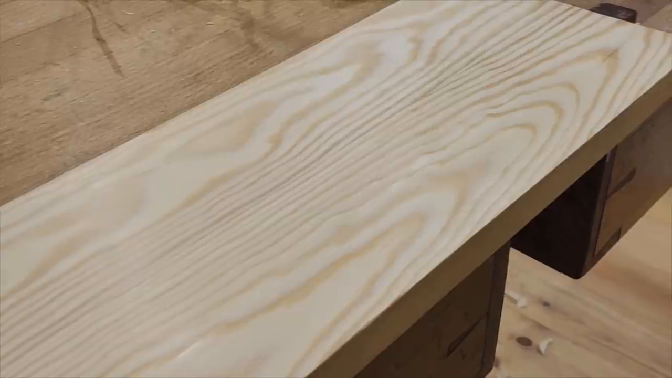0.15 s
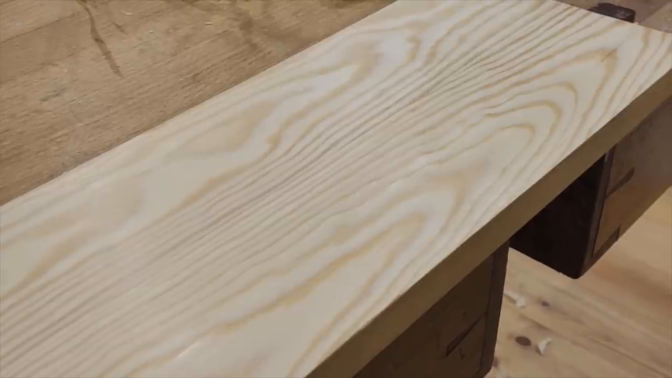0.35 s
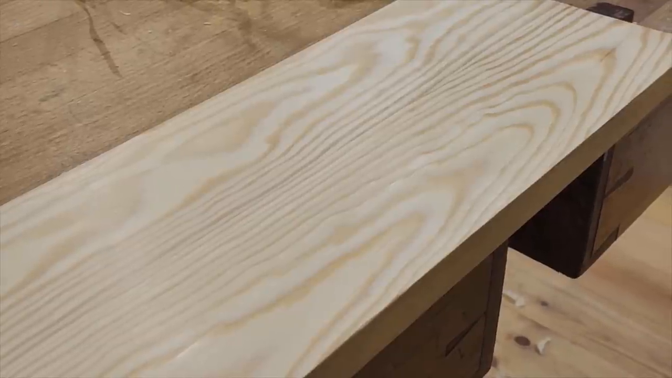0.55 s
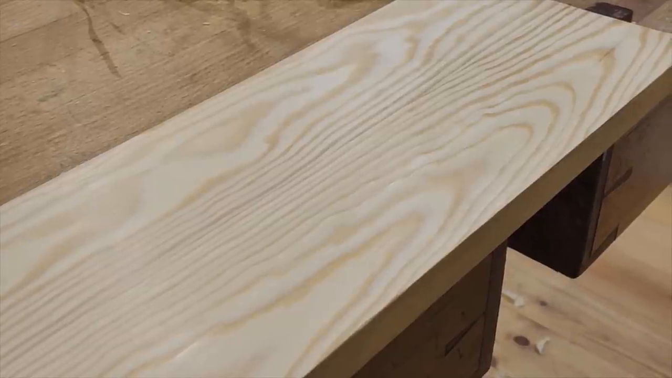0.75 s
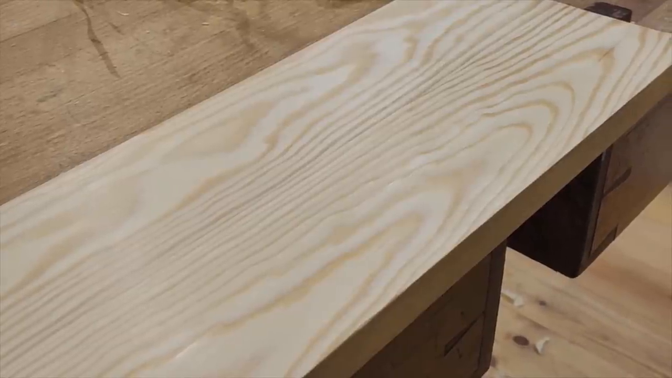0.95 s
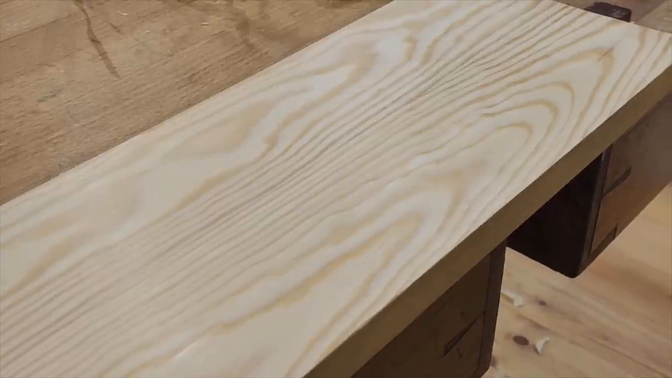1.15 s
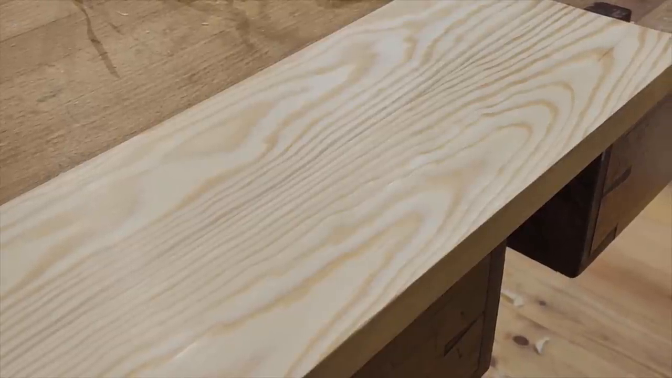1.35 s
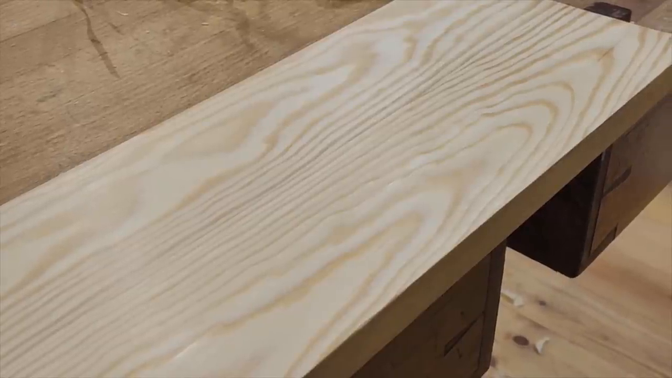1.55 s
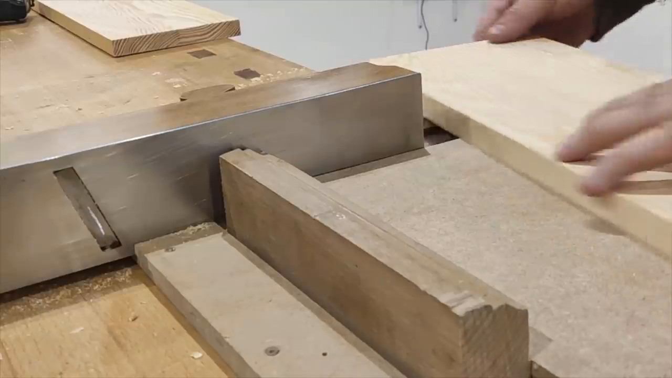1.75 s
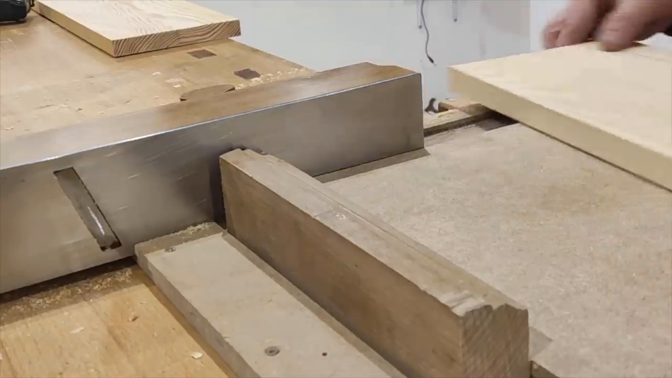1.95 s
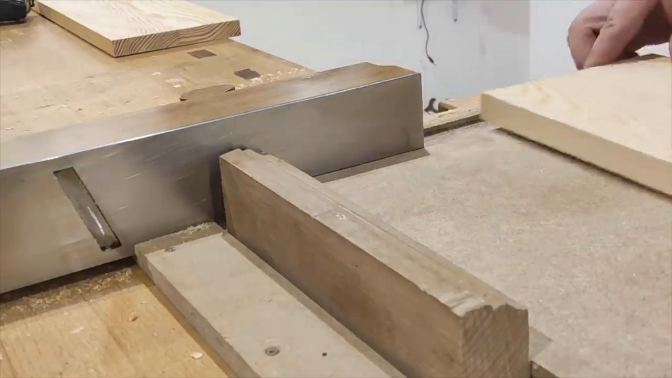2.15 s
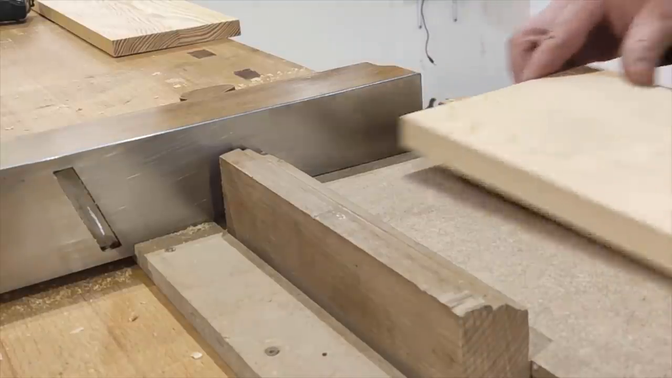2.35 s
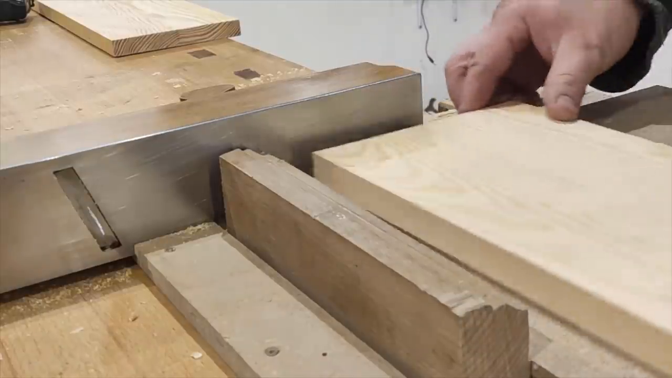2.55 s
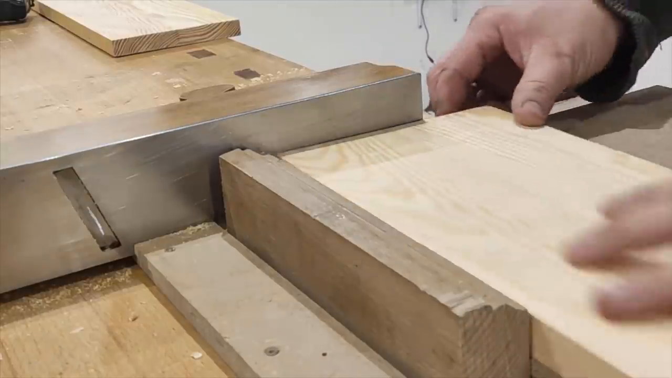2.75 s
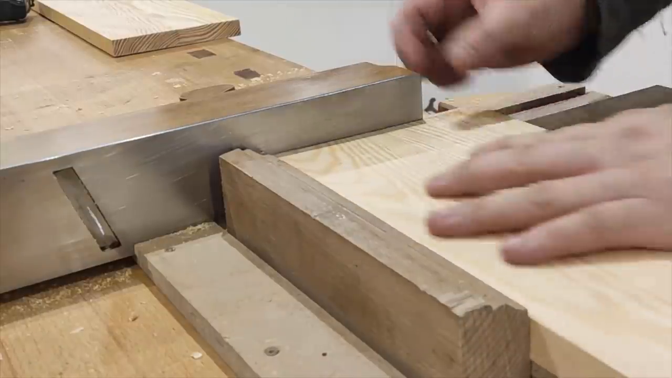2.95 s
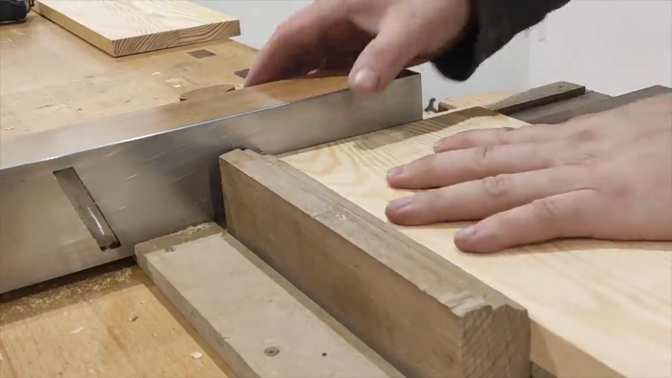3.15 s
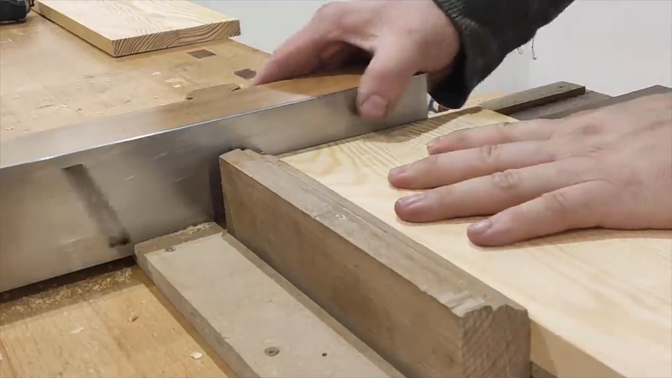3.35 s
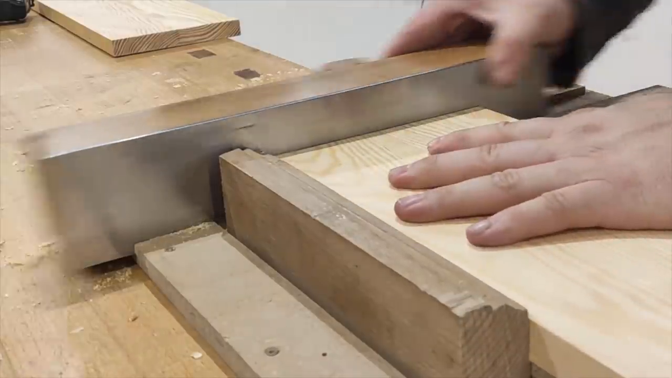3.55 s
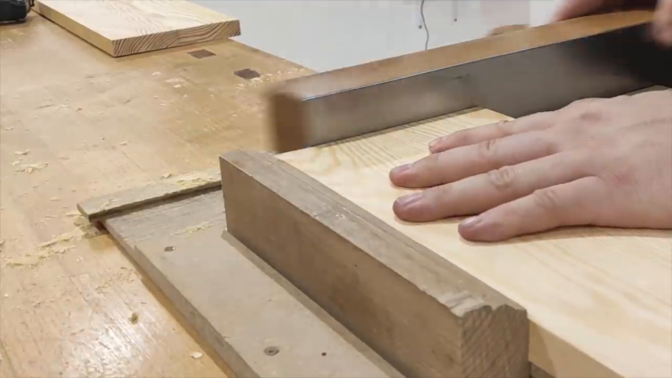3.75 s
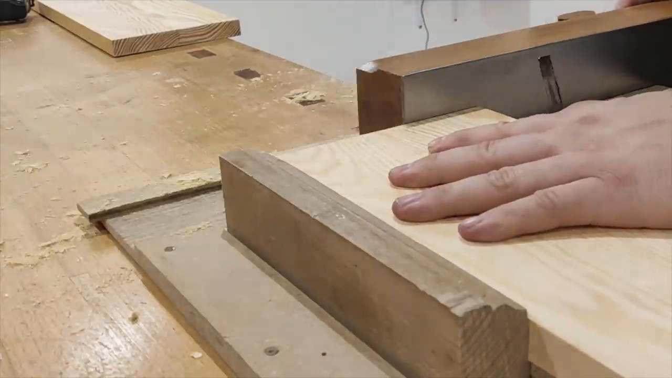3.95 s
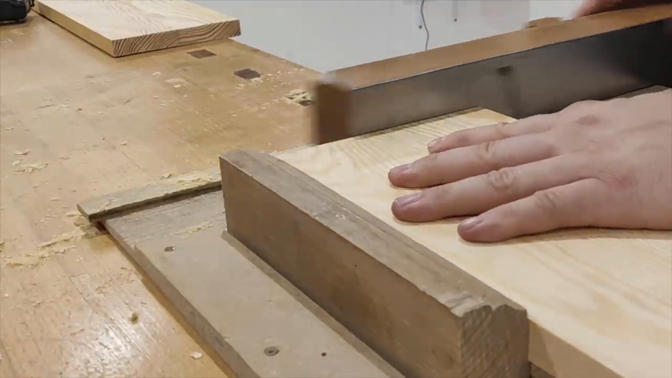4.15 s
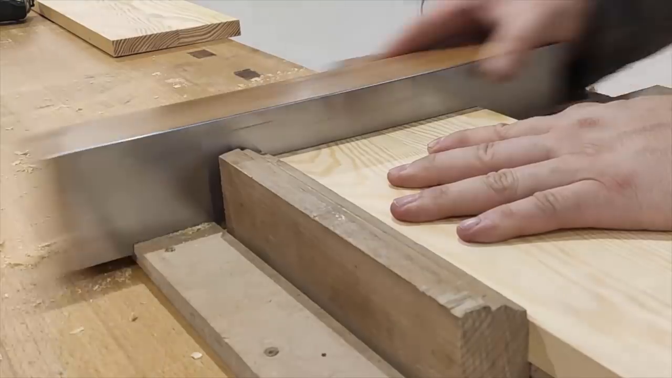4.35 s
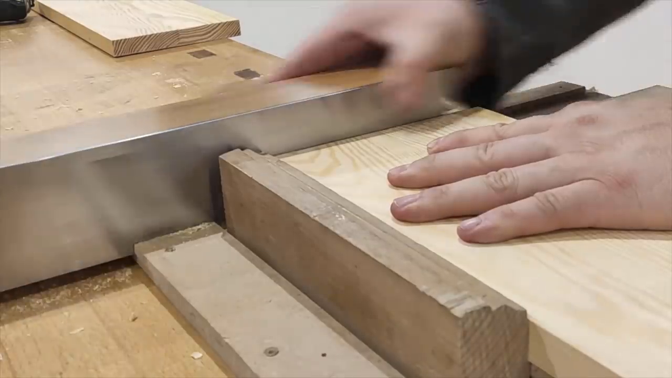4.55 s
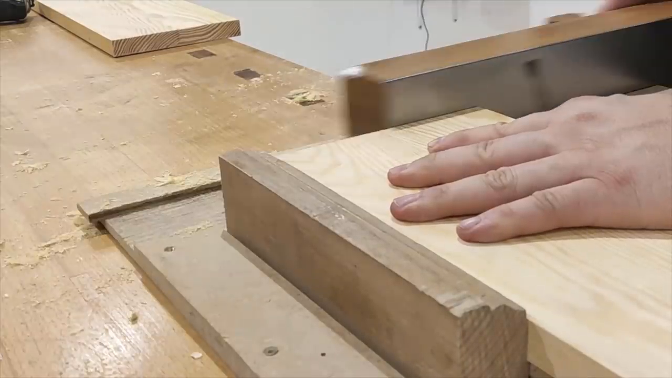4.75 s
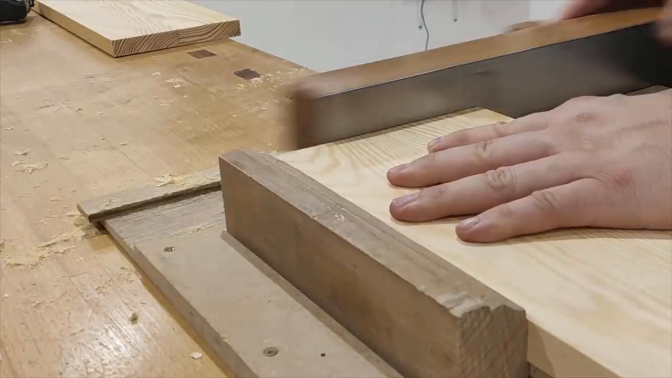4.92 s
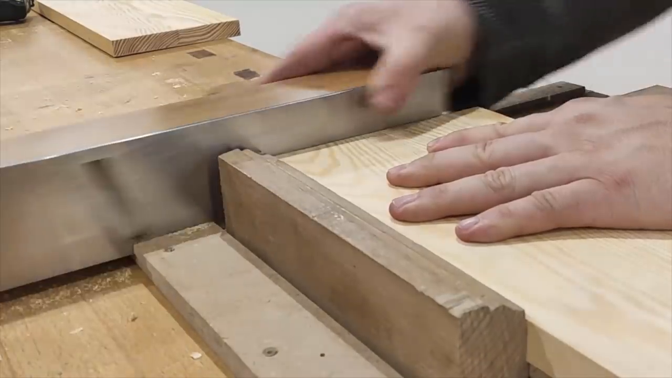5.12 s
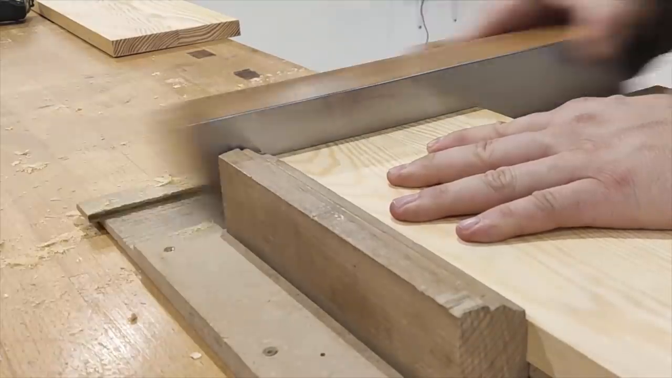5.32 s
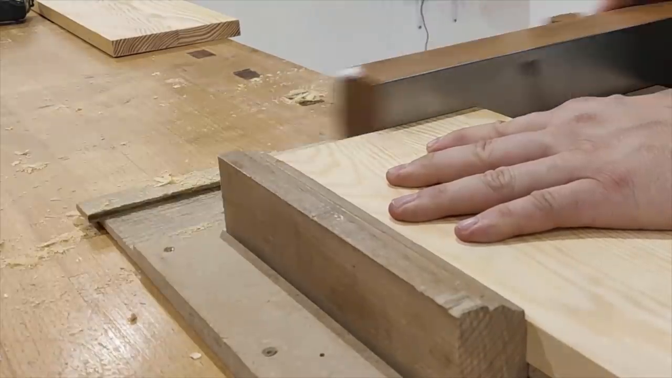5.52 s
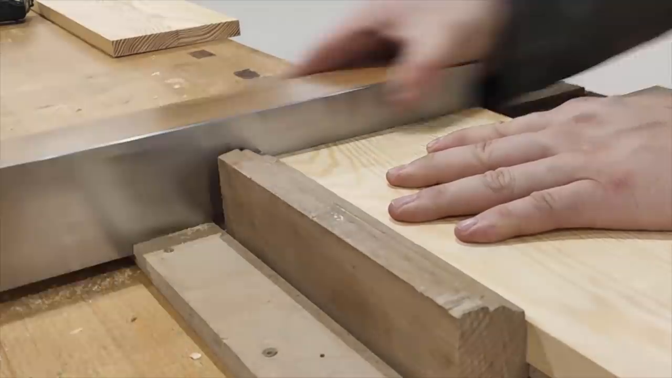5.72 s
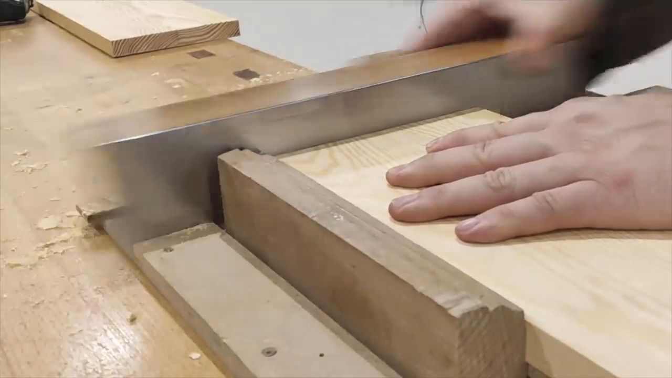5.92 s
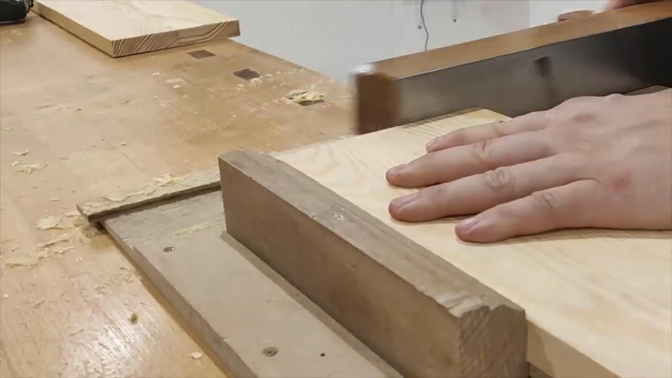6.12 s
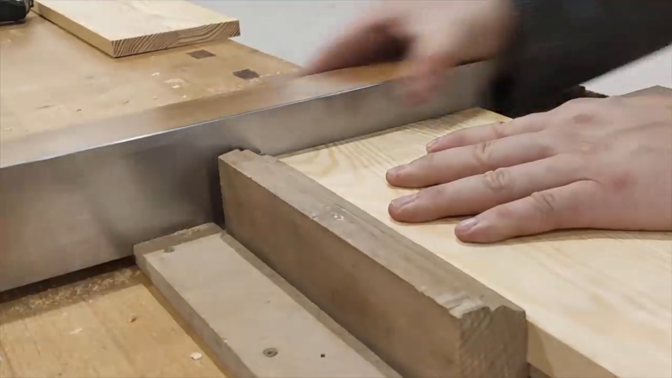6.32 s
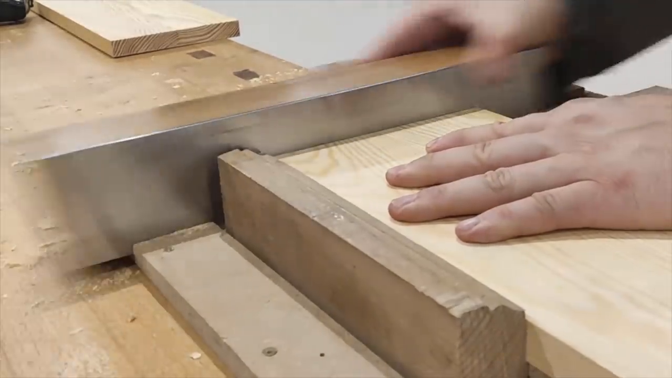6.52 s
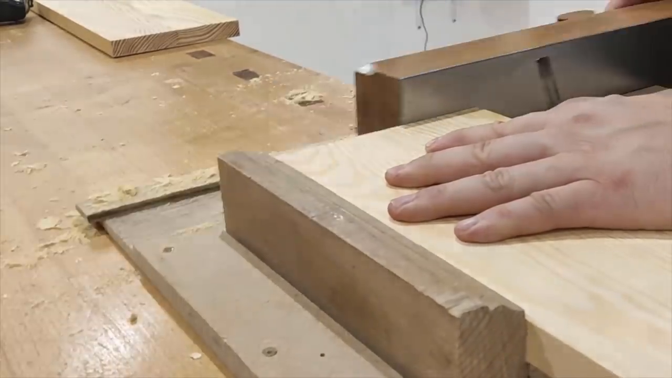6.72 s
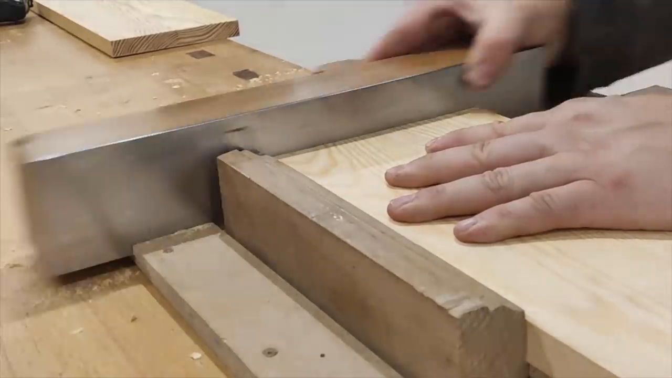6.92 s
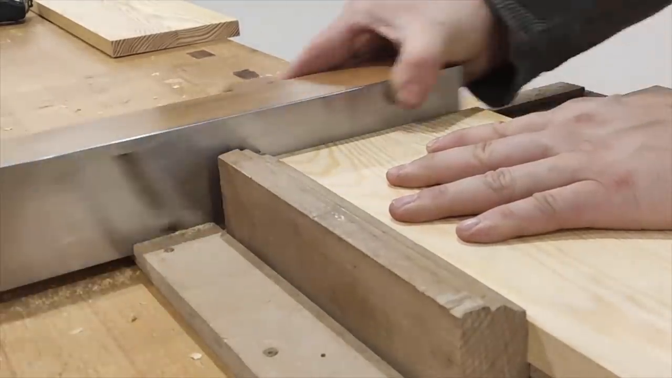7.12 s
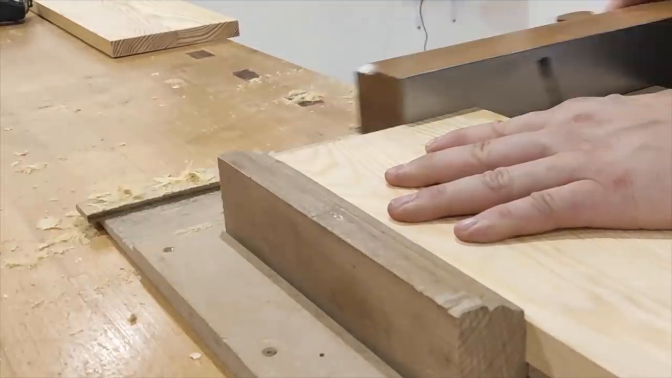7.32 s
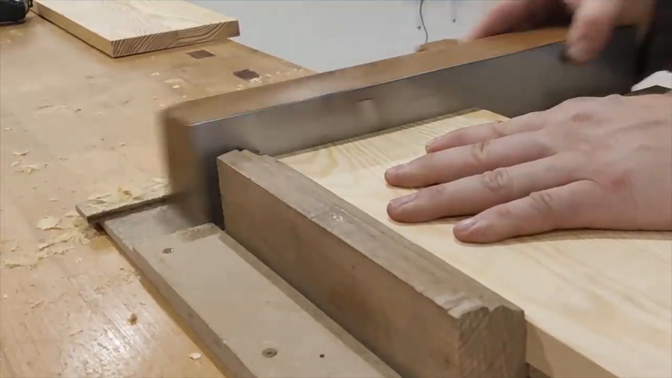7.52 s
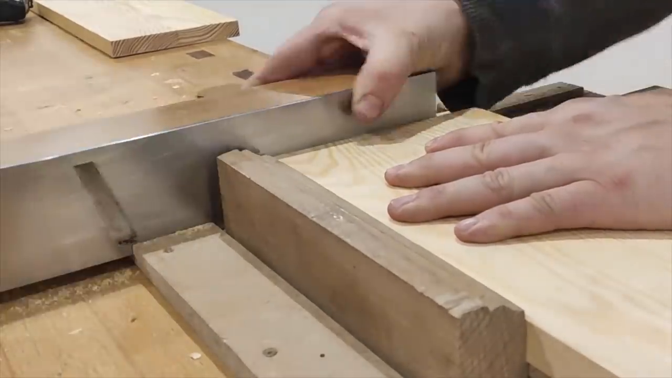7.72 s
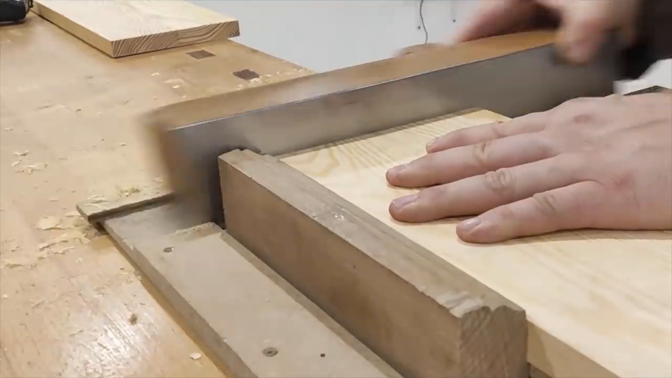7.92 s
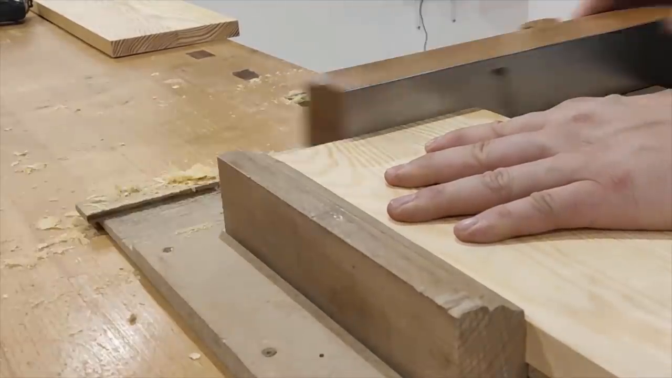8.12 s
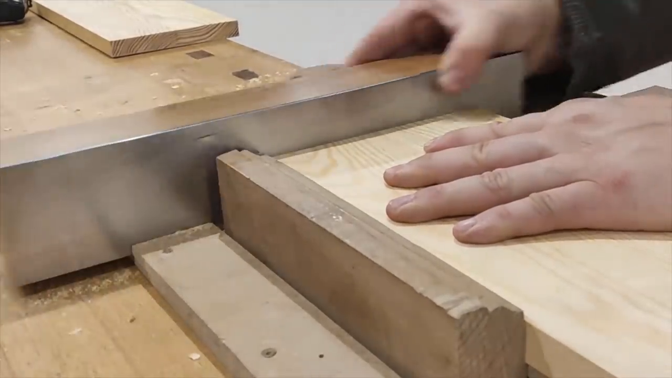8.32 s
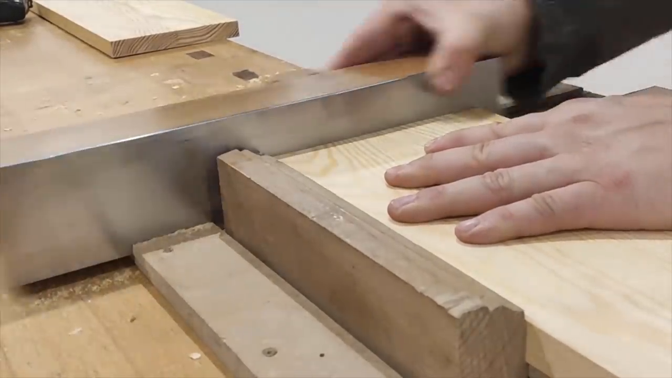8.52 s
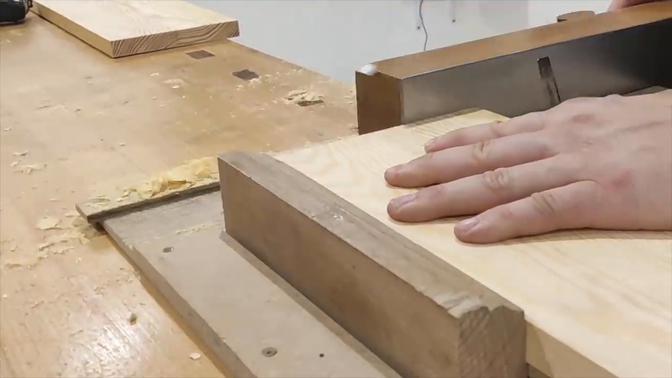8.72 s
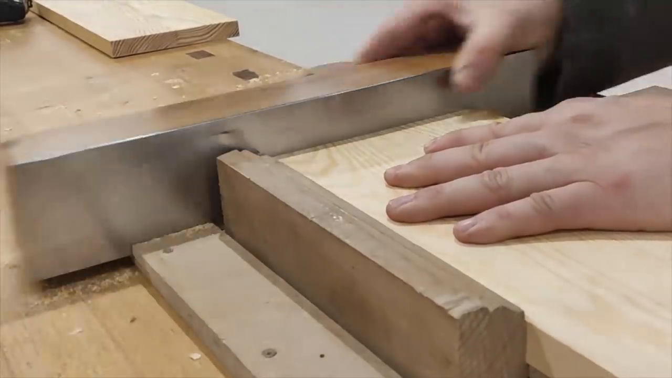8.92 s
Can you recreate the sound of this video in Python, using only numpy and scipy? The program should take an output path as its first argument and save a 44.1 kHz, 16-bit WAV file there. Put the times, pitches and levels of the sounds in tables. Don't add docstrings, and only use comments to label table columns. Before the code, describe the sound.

For the first 1.6 seconds there is little but low room air and faint mains hum in a small workshop. At about 1.7 a pine board knocks and scrapes dryly over dusty fibreboard, harsher near 2.4, then bumps the wooden fence in a cluster of dull knocks from 2.6 to 2.9. A hand settles a long wooden plane from 3.2, with soft rubbing, small snaps and a hollow clack at 3.8. Planing begins lightly at 4.25, with a return at 4.7, then continues from 5.0 with a push roughly every 0.65 seconds until 9. Pushes bite with a bright, gritty rasp of torn end grain; pulls between them knock, drag and crack sharply, with a hollow, sinking sliding ring. Cuts grow stronger, jolting the bench into low rumbles. Close stereo phone microphones, short room echo.

```python
import sys
import numpy as np
from scipy import signal
from scipy.fft import rfft, irfft
from scipy.io import wavfile
from scipy.ndimage import uniform_filter1d

SR = 44100
rng = np.random.default_rng(int(sys.argv[2]) if len(sys.argv) > 2 else 0)


def wrap_up_sound(samples):
    columns = np.atleast_2d(samples).T
    tamed = np.clip(columns, -1, 1)
    steps = np.round(tamed * 32767).astype(np.int16)
    wavfile.write(sys.argv[1], SR, steps)


def gain_from_decibels(decibels):
    exponent = np.asarray(decibels, float) / 20
    return 10 ** exponent


N = 399987
TAPS = 2 ** 14
HZ = np.arange(TAPS // 2 + 1) * SR / TAPS + 1.

# frequency_hz, density_db [dB per Hz]
SHOP_AIR = [(18, -13), (38, 10.5), (62, -11), (147, -9), (204, -9), (283, -12), (546, -19.5), (629, -15),
            (1300, -27), (1990, -25.5), (6300, -37.5), (8540, -51), (15000, -38), (16500, -57)]
# pitch_hz, level_db
HUM_TONES = [(102.3, -58.5), (199.2, -61), (247.6, -68), (446.8, -76.5), (602.9, -82), (624.5, -72.5),
             (1227, -84), (1965, -74.5)]
# pitch_hz, width_hz, level_db
BENCH_MODES = [(55.5, 13, -14.5), (165.8, 26, 8), (272.4, 59, 0), (490, 31, -6)]
# start_s, sway_db, top_boards_db
BENCH_JOLTS = [(1.12, -48.5, -75), (1.66, -37.5, -41), (2.56, -40, -45), (2.86, -48, -50), (3.56, -44, -50),
               (3.85, -58, -52), (4.3, -47, -50), (4.65, -36.5, -47), (4.99, -33.5, -43),
               (5.39, -39, -40.5), (5.625, -27, -40.5), (6.007, -43.5, -40.5), (6.236, -25.5, -31.5),
               (6.602, -38, -33.5), (6.9, -26.5, -32.5), (7.295, -39, -33.5), (7.518, -28, -33),
               (8.014, -39.5, -41), (8.203, -33.5, -31), (8.635, -34, -35.5), (8.885, -28, -26)]
# start_s, scrape_db, weight_on_board_db
BOARD_DRAG = [
    (1.662, -49, 7),
    (1.875, -40, 6),
    (2.235, -44.5, 4),
    (2.369, -36, 4.5),
    (2.57, -42.5, 9),
    (2.743, -45, 3),
    (2.967, -48, -6.5),
    (3.095, -51.5, -2.5),
    (3.2, -60, 9),
]
# frequency_hz, density_db [dB per Hz]
SCRAPE_COLOUR = [(130, -21), (220, -11), (264, 8), (399, 9.5), (950, 6.5), (5890, -4), (8460, -16),
                 (15100, -19.5), (16500, -41)]
# pitch_hz, width_hz, level_db
BOARD_MODES = [(938, 29, -5.5), (1457, 15, -0.5), (1940, 40, -20), (2195, 62, -3.5), (3100, 340, -9),
               (4140, 450, -22), (5830, 56, -9), (6640, 170, -5)]
# pitch_hz, width_hz, level_db
SCUFF_MODES = [(895, 99, -16.5), (1480, 66, -16), (1930, 63, -36), (3430, 270, -22), (4030, 300, -13.5)]
# start_s, peak_db, pitch_hz, t60_s
WOOD_KNOCKS = [(1.663, -31, 297, 0.14), (2.574, -28, 317, 0.069), (2.599, -31.5, 713, 0.085),
               (2.742, -22, 268, 0.13), (2.857, -30, 195, 0.051), (2.907, -34, 352, 0.071),
               (3.504, -36, 876, 0.06), (3.579, -31, 253, 0.045), (3.831, -29, 285, 0.15),
               (4.624, -34, 606, 0.059), (4.72, -29, 1160, 0.04), (4.859, -31.5, 173, 0.15)]
# start_s, rubbing_db
PLANE_SETTLING = [
    (3.2, -65),
    (3.24, -74),
    (3.3, -55),
    (3.384, -48.5),
    (3.46, -51),
    (3.785, -51),
    (4.013, -62.5),
    (4.093, -54),
    (4.25, -56),
]
# start_s, rise_s, level_db, fall_s
SIDE_SHOVES = [
    (3.35, 0.16, -54, 0.055),
    (3.804, 0.005, -49, 0.16),
]
# start_s, bite_db, sag_db, length_s [until the iron leaves the far edge], last_tear_db
PUSHES_CUT = [
    (4.252, -21, -43, 0.035, -35),
    (4.988, -17, -30.5, 0.066, -33),
    (5.623, -17, -43.5, 0.11, -18.5),
    (6.237, -15, -30, 0.09, -19.5),
    (6.854, -16, -28.5, .12, -17.5),
    (7.515, -17.5, -22, 0.16, -16),
    (8.202, -15, -19.5, 0.12, -14),
    (8.867, -16.5, -19, 0.077, -11.5),
]
# start_s, knock_db, drag_db, length_s [until the iron drops off the near edge], edge_drag_db
PULLS_BACK = [
    (4.711, -40, -43.5, 0.065, -34),
    (5.337, -31, -41.5, 0.084, -27.5),
    (5.966, -27, -39.5, 0.079, -23),
    (6.589, -31, -38, .075, -22),
    (7.246, -25.5, -34.5, 0.079, -23.5),
    (7.946, -25, -28.5, 0.084, -26),
    (8.616, -26, -30, 0.083, -21.5),
]
# start_s, peak_db, t60_s
FIBRE_SNAPS = [(3.5036, -20, 0.047), (3.797, -23.5, 0.079), (4.4303, -31, 0.24), (4.672, -24.5, 0.048),
               (4.7215, -21, 0.035), (4.7518, -13.5, 0.043), (5.2165, -48, 0.066), (5.4117, -4.5, 0.041),
               (5.39, -11.5, 0.064), (5.8395, -40, 0.063), (5.9014, -37, 0.065), (6.0173, -12.5, 0.08),
               (6.0452, -6.5, 0.068), (6.33, -2, 0.023), (6.4812, -33, 0.35), (6.586, -5, 0.035),
               (6.652, -13, 0.24), (6.9623, -7.5, 0.051), (7.128, -28, 0.05), (7.309, -12, 0.08),
               (7.328, -14, 0.044), (8.021, -7.5, 0.061), (8.9326, -19, 0.28)]
# frequency_hz, density_db [dB per Hz]
CUT_COLOUR = [(130, -20), (220, -7), (268, -5), (738, -6.5), (1440, -3), (1820, -3), (4260, -2.5),
              (8460, -23), (15100, -21.5), (16500, -73)]
# pitch_hz, width_hz, level_db
IRON_MODES = [(3630, 120, -6), (3980, 97, -6.5), (5580, 90, 3), (6310, 240, 4), (6800, 530, 5.5),
              (10000, 97, 2)]
# pitch_hz, width_hz, level_db
BODY_MODES = [(1555, 160, -1.5), (2170, 280, -0.5), (2580, 390, -3), (2915, 92, 1), (3080, 77, -1)]
# pitch_hz, width_hz, level_db
CHATTER_MODES = [(1467, 110, -13), (2130, 170, -13), (2950, 170, -1), (3300, 160, -7), (4267, 170, -6),
                 (6404, 150, -11), (6797, 175, -12)]
# pitch_hz, width_hz, level_db
JIG_MODES = [(277, 28, -2), (469, 53, -11), (705, 38, -5), (874, 23, -22), (1200, 33, -7)]
# pitch_hz, width_hz, level_db
THROAT_MODES = [(1500, 80, -6), (2090, 85, -5), (2330, 80, -7), (2560, 85, -6), (2850, 90, -7),
                (3170, 120, -5)]
# start_s, peak_db, strongest_pitch_hz, t60_s, sinking_hz_per_s
THROAT_SINGING = [
    (3.802, -27, 2220, 0.48, 920),
    (4.262, -24, 2230, .46, 396),
    (4.751, -14, 2520, 0.53, 2200),
    (5.414, -13, 2680, 0.53, 2000),
    (6.02, -19, 2650, 0.85, 1300),
    (6.64, -15.5, 2420, 0.79, 1100),
    (7.318, -12, 2440, 0.6, 1500),
    (8.034, -10.5, 2100, 0.56, 100),
    (8.629, -14.5, 2630, 0.88, 1200),
]

SHOP_DB, SHOP_T60_S, ECHO_DB = -57, 0.39, -8.5
LEAN_DB_S, SETTLING_DB_S, RESTLESS_DB = (450, 450), (53, 61), (-53, -57)
DUST_DB, DUST_PER_WEIGHT, JIG_DB, RATTLE_DB, RATTLE_DB_S = -8.5, -0.78, -52, -7.5, 213
BITE_S, HOLD_S, LAST_SHARE, LEAVE_S, LEAVE_DB = 0.0053, 0.012, 0.095, 0.036, -39.5
NICK_DB, NICK_S = -3, 0.013
HISS_PER_BITE, FULL_BITE_DB, CHATTER_PER_DB = 0.99, -17.5, 0.4
COAST_DB, COAST_DB_S, COAST_SPAN_S = -21, 83.5, 0.4
KNOCK_S, DULLING_DB, DROP_S, DROP_DB, RUNOUT_S, RUNOUT_DB = 0.017, -9.5, 0.037, -17, 0.11, -29.5
RUNUP_DB, RUNUP_S, RUNUP_FROM_DB = (-49, -46), (0.072, 0.13), -7.5
CUT_MIX, LAST_MIX, COAST_MIX, KNOCK_MIX = (0, -11, -16), (-5, -5, -12), (11.1, -24, 5), (7.5, -9.5, -2)
DRAG_MIX, RUNOUT_MIX, SOLE_MIX = (0, -29, -11.5), (11, -29, 2.95), (3.6, -6.5, 3.8)
SETTLE_MIX, SHOVE_MIX = (5.4, -5.5, 2.3), (6.5, -25, 11.5)


def colour(points):
    hz, db = np.transpose(points)
    return gain_from_decibels(np.interp(np.log(HZ), np.log(hz), db))


def modes(table, ring_db):
    power = 1
    for hz, width, db in table:
        power = power + gain_from_decibels(2 * (db + ring_db)) / (1 + ((HZ - hz ** 2 / HZ) / width) ** 2)
    return np.sqrt(power)


def band(lo_hz, hi_hz):
    return 1 / np.sqrt((1 + (lo_hz / HZ) ** 10) * (1 + (HZ / hi_hz) ** 10))


def through(x, gain):
    cepstrum = irfft(np.log(gain / np.sqrt(np.mean(gain ** 2)) + 1e-5))
    cepstrum[1:TAPS // 2] *= 2
    cepstrum[TAPS // 2 + 1:] = 0
    response = irfft(np.exp(rfft(cepstrum)))
    return signal.oaconvolve(x, response[None], axes=1)[:, :N]


def held(rate_hz):
    k = int(SR / rate_hz)
    return uniform_filter1d(np.repeat(rng.standard_normal(N // k + 1), k), k)[:N]


def line(times, db):
    return np.interp(np.arange(N) / SR, np.maximum.accumulate(times), db, left=-140, right=-140)


def spread(count, alike):
    share = np.clip(alike, 0, 1)
    common, left, right = rng.standard_normal((3, count))
    return np.sqrt(share) * common + np.sqrt(1 - share) * np.array([left, right])


def bursts(times, peak_db, t60):
    out, t = np.zeros(N), np.arange(SR // 4) / SR
    for s, db, fall in zip(times, peak_db, t60):
        i = int(s * SR)
        shape = gain_from_decibels(db - 60 * t / max(fall, .005)) * np.minimum(t / 0.0034, 1)
        out[i:i + len(t)] += shape[:N - i]
    return out * spread(N, alike=0.44)


def fibres(grain_db, judder_db, ring_db, alike):
    uneven_db = grain_db * held(3000) + judder_db * held(350) + ring_db * held(45)
    x = spread(N, alike) * gain_from_decibels(uneven_db)
    return x / x.std()


def friction(controls, slips, spectrum, high, low):
    tear_db, body_db, hiss_db, jig_db = controls
    tear = through(slips * gain_from_decibels(tear_db), spectrum * high * band(2435, 7130))
    body = through(slips * gain_from_decibels(tear_db + body_db), spectrum * low * band(970, 2950))
    jig = through(slips * gain_from_decibels(tear_db + jig_db), spectrum * modes(BENCH_MODES, 3.7) * band(205, 830))
    hiss = through(slips * gain_from_decibels(tear_db + hiss_db), spectrum * high * band(7370, 24800))
    return tear + gain_from_decibels(-2.9) * body + jig + gain_from_decibels(2.5) * hiss


def patches(tear_db, slips, table, wander_db, rate_hz):
    drive, out = slips * gain_from_decibels(tear_db), 0
    for hz, width, db in table:
        ring = signal.lfilter(*signal.iirpeak(hz, hz / abs(width), SR), drive)
        ring = ring * np.sqrt(SR / np.pi / abs(width))
        out = out + gain_from_decibels(db + wander_db * held(rate_hz)) * ring
    return out


def shop():
    gain = colour(SHOP_AIR)
    scale = np.sqrt(np.mean(gain ** 2) / np.mean(gain ** 2 * (HZ > 250)))
    air = gain_from_decibels(SHOP_DB) * scale * through(rng.standard_normal((2, N)), gain)
    t, hum = np.arange(N) / SR, 0
    for hz, db in HUM_TONES:
        hum = hum + gain_from_decibels(db + 4.0 + 3.6 * held(7.6)) * np.sin(2 * np.pi * hz * t + 0.37 * held(4.8))
    return air + hum


def shaking():
    t, (s, *peaks) = np.arange(N) / SR, np.transpose(BENCH_JOLTS)
    for peak, lean, settle, rest in zip(peaks, LEAN_DB_S, SETTLING_DB_S, RESTLESS_DB):
        power = sum(gain_from_decibels(2 * (db - np.maximum(lean * (k - t), settle * (t - k)))) for k, db in zip(s, peak))
        yield 10 * np.log10(power + gain_from_decibels(2 * rest) * (t > s[1]) + 1e-14)


def bench():
    top, shake = modes(BENCH_MODES, 16.0), fibres(0.09, 1.0, 0.34, alike=0.75)
    edges_hz = ((36, 61.6), (105, 207))
    return sum(through(shake * gain_from_decibels(db), top * band(*hz)) for db, hz in zip(shaking(), edges_hz))


def dragging():
    s, scrape, weight = np.transpose(BOARD_DRAG)
    scrape_db, weight_db = line(s, scrape), np.interp(np.arange(N) / SR, s, weight)
    jig_power = gain_from_decibels(2 * line(s[[0, -1]], [JIG_DB, JIG_DB]))
    for start, db, *_ in WOOD_KNOCKS[:6]:
        peak = db + RATTLE_DB
        jig_power = jig_power + gain_from_decibels(2 * line([start, start + .5], [peak, peak - RATTLE_DB_S / 2]))
    jig_db = 10 * np.log10(jig_power)
    return scrape_db, weight_db, DUST_DB + DUST_PER_WEIGHT * weight_db, jig_db - scrape_db


def board():
    wood, slips = modes(BOARD_MODES, 9.5), fibres(0.78, 1.0, 1.37, alike=0.28)
    work = dragging()
    scuff = gain_from_decibels(-3) * patches(work[0], slips, SCUFF_MODES, 6., rate_hz=7)
    return friction(work, slips, colour(SCRAPE_COLOUR), wood, wood) + scuff


def knocks():
    s, db, hz, t60 = np.transpose(WOOD_KNOCKS)
    out, t = np.zeros(N), np.arange(SR // 4) / SR
    for i, g, f, fall in zip((s * SR).astype(int), gain_from_decibels(db - 2.5), hz, t60):
        for ratio, share in ((1, 1), (1.7, 0.45), (2.9, 0.15)):
            decay = gain_from_decibels(-60 * t * ratio ** .5 / max(fall, .01))
            out[i:i + len(t)] += g * share * np.sin(2 * np.pi * f * ratio * t) * decay
    return out + gain_from_decibels(-5.0) * through(bursts(s, db, 0.72 * t60), band(150, 1500))


def throat():
    out, t = np.zeros((2, N + SR)), np.arange(SR // 2) / SR
    for s, db, centre_hz, t60, sink_hz in THROAT_SINGING:
        rub = spread(len(t), alike=0.13) * gain_from_decibels(db) * np.minimum(t / 0.0012, 1)
        slide = rub * gain_from_decibels(-60 * t / max(t60, .05))
        clack = rub * gain_from_decibels(5.0 - 60 * t / 0.045)
        for hz, width, mode_db in THROAT_MODES:
            distance = np.clip((hz - centre_hz + sink_hz * t) / 400, -1.3, 2.5)
            near_db = -(5 + 40 * t) * abs(distance)
            mode, skirt = (signal.iirpeak(hz, hz / abs(k * width), SR) for k in (1.3, 2.6))
            ring = signal.lfilter(*mode, signal.lfilter(*skirt, slide) + clack)
            out[:, int(s * SR):][:, :len(t)] += gain_from_decibels(mode_db + near_db + 15) * ring
    return out[:, :N] * gain_from_decibels(2.5 * held(40))


def push(s, bite, sag, length, last):
    turn, off = s + (1 - LAST_SHARE) * length, s + length
    mix = np.add(CUT_MIX, [0, HISS_PER_BITE * (bite - FULL_BITE_DB), 0])
    cut = line([s - BITE_S, s, s + HOLD_S, turn, off + LEAVE_S], [bite - 30, bite, bite, sag, sag + LEAVE_DB])
    nick = line([s - BITE_S, s, s + NICK_S], bite + NICK_DB - np.array([30, 0, 10]))
    tear_out = line([turn, off, off + LEAVE_S], [sag - 6, last, last + LEAVE_DB])
    slowing = np.array([0, 0, COAST_DB_S * COAST_SPAN_S])
    coast = line([s, off, off + COAST_SPAN_S], bite + COAST_DB - slowing)
    return [(cut, mix), (nick, mix), (tear_out, LAST_MIX), (coast, COAST_MIX)]


def pull(s, knock, drag, length, edge):
    off = s + length
    bump = line([s - BITE_S, s, s + KNOCK_S, off + DROP_S], [knock - 30, knock, drag, drag + DULLING_DB])
    rub = line([s, s + KNOCK_S, off, off + DROP_S], [drag - 10, drag - 3, edge, edge + DROP_DB])
    falling = np.array([DROP_DB, RUNOUT_DB, 2 * RUNOUT_DB])
    runout = line([off, off + RUNOUT_S, off + COAST_SPAN_S], edge + falling)
    return [(bump, KNOCK_MIX), (rub, DRAG_MIX), (runout, RUNOUT_MIX)]


def run_up(s, db, lead):
    rise = np.array([2 * RUNUP_FROM_DB, RUNUP_FROM_DB, -2.5, 0])
    return line([s - 2 * lead, s - lead, s - lead / 2, s], db + rise), SOLE_MIX


def together(parts):
    power = sum(np.outer(gain_from_decibels(2 * np.r_[0, mix]), gain_from_decibels(2 * db)) for db, mix in parts)
    db = 10 * np.log10(power)
    return db[0], *(db[1:] - db[0])


def strokes():
    parts = [(line(*np.transpose(PLANE_SETTLING)), SETTLE_MIX)]
    for event in PUSHES_CUT:
        parts += push(*event)
    for event in PULLS_BACK:
        parts += pull(*event)
    for s, rise, db, fall in SIDE_SHOVES:
        parts.append((line([s - rise, s, s + fall], [db - 12.5, db, db - 18]), SHOVE_MIX))
    for table, db, lead in zip((PUSHES_CUT, PULLS_BACK), RUNUP_DB, RUNUP_S):
        parts += [run_up(s, db, lead) for s, *_ in table]
    return together(parts)


def plane():
    iron, body, cut = modes(IRON_MODES, 3.8), modes(BODY_MODES, 3.8), colour(CUT_COLOUR)
    snaps = through(bursts(*np.transpose(FIBRE_SNAPS)), cut * iron * body)
    slips, work = fibres(2.5, 1.6, 1.2, alike=0.37), strokes()
    chatter_db = work[0] + CHATTER_PER_DB * (work[0] - FULL_BITE_DB)
    chatter = gain_from_decibels(-5) * patches(chatter_db, slips, CHATTER_MODES, 4.5, rate_hz=26)
    creak = gain_from_decibels(-13) * patches(work[0] + work[3], slips, JIG_MODES, 6., rate_hz=12)
    return friction(work, slips, cut, iron, body) + chatter + gain_from_decibels(-8) * snaps + throat() + creak


def walls(x):
    t = np.arange(SR // 2) / SR
    tail = rng.standard_normal((2, len(t))) * gain_from_decibels(-60 * t / SHOP_T60_S) * np.minimum(t / 0.01, 1)
    tail = tail * gain_from_decibels(ECHO_DB) / np.sqrt(np.sum(tail[0] ** 2))
    return x + signal.oaconvolve(x, tail, axes=1)[:, :N]


def microphones(left, right):
    mid, side = (left + right) / 2, (left - right) / 2
    far = signal.lfilter(*signal.butter(1, 600, "highpass", fs=SR), side)
    low_side = signal.lfilter(*signal.butter(2, 90, fs=SR), side)
    low_mid = signal.lfilter(*signal.butter(1, 120, fs=SR), mid)
    side = gain_from_decibels(0.5) * far + 0.15 * side + 0.61 * low_side - 0.23 * low_mid
    return gain_from_decibels(-0.7) * np.array([mid + side, mid - side])


def scene():
    left, right = shop() + walls(bench() + board() + knocks() + plane())
    return microphones(left, right)


def low_pass(x):
    return signal.sosfilt(signal.butter(12, 16970, fs=SR, output="sos"), x)


def record(dry):
    mix = np.tanh(dry)
    return low_pass(mix)


dry = scene()
out = record(dry)
wrap_up_sound(out)
```